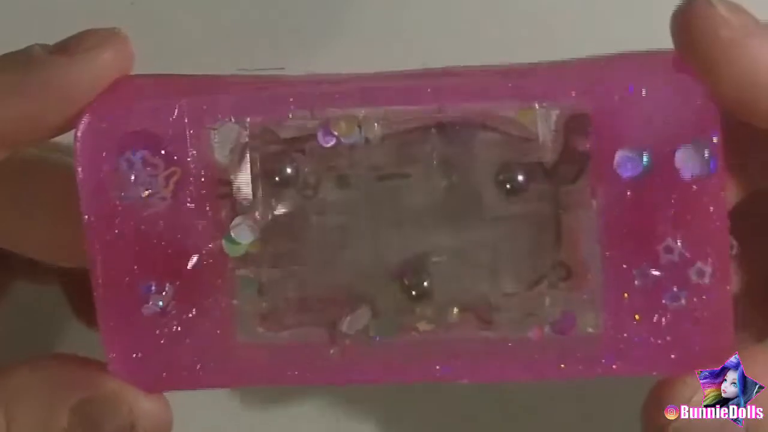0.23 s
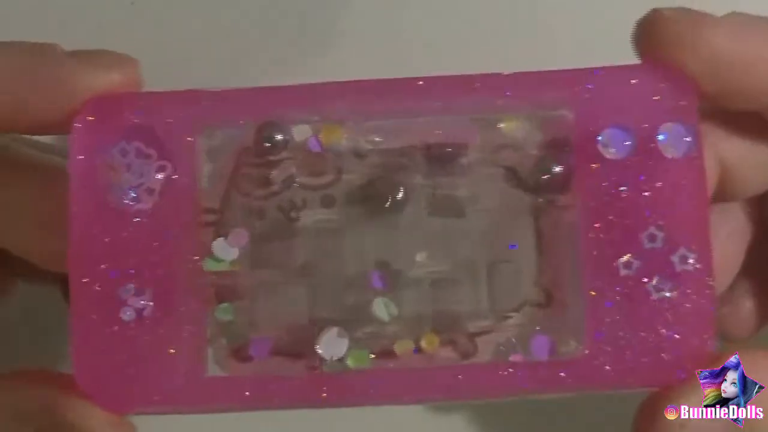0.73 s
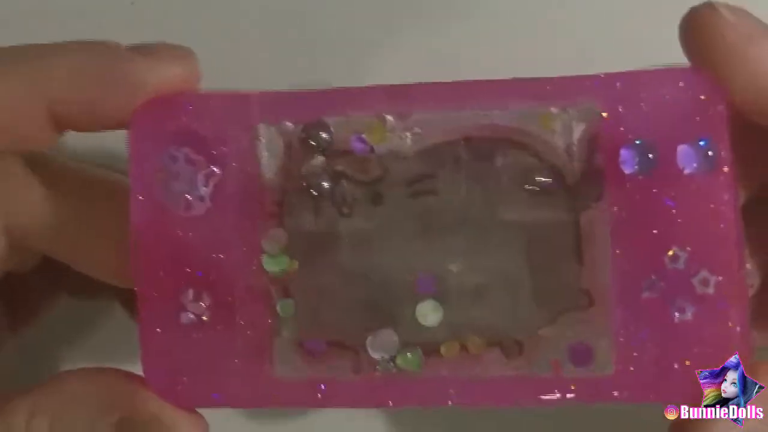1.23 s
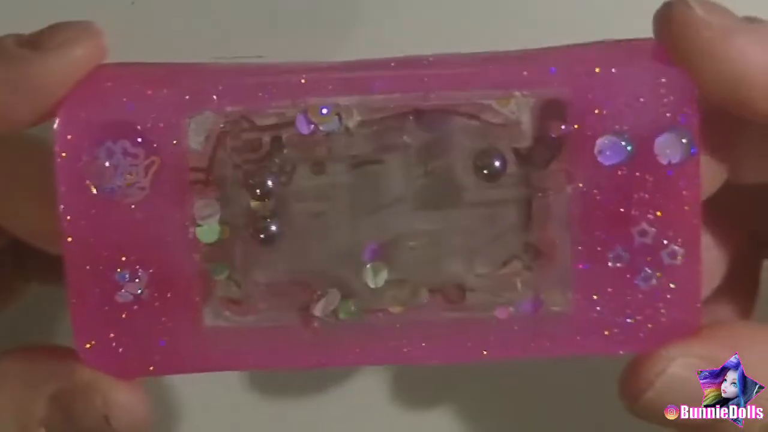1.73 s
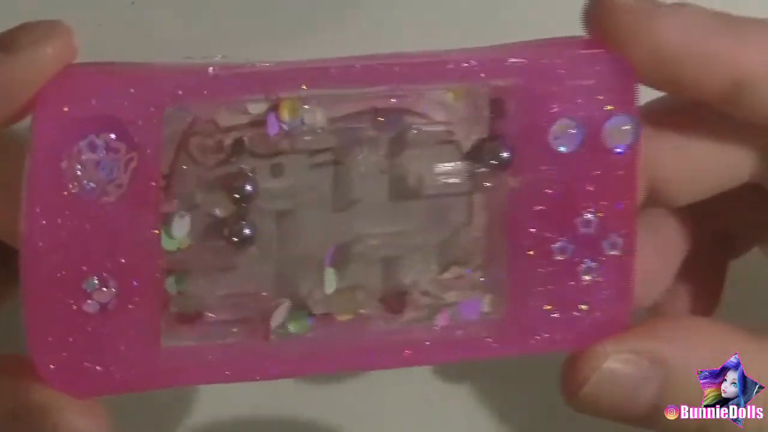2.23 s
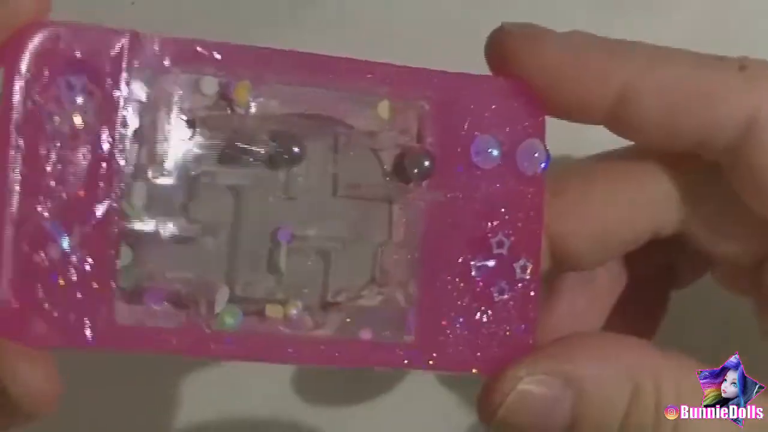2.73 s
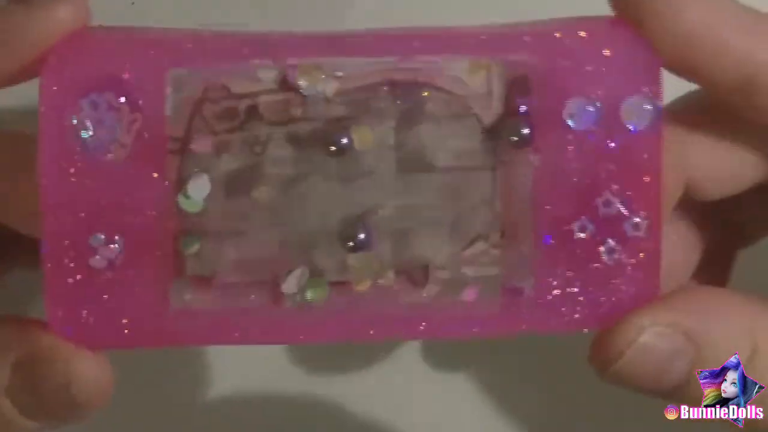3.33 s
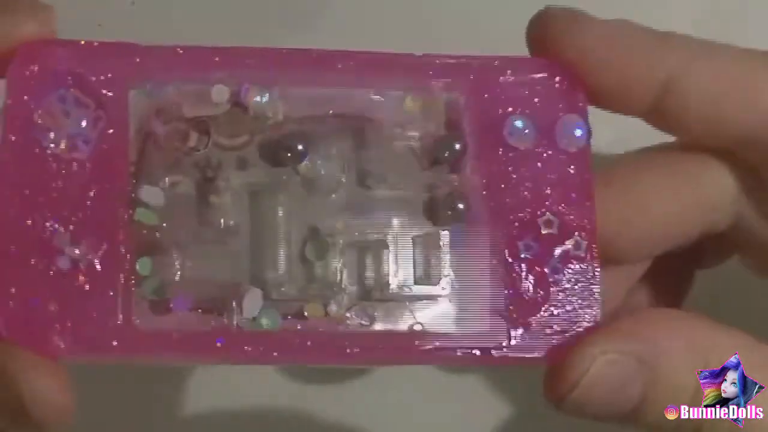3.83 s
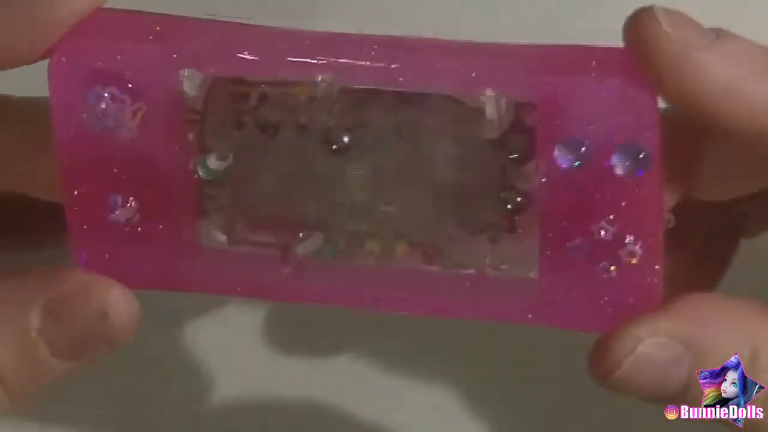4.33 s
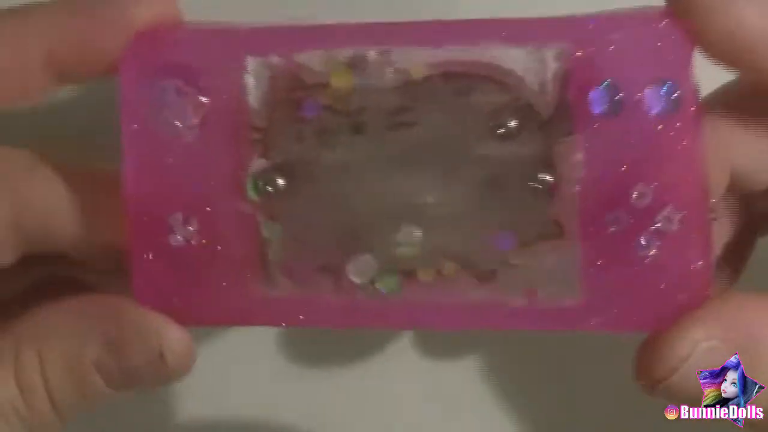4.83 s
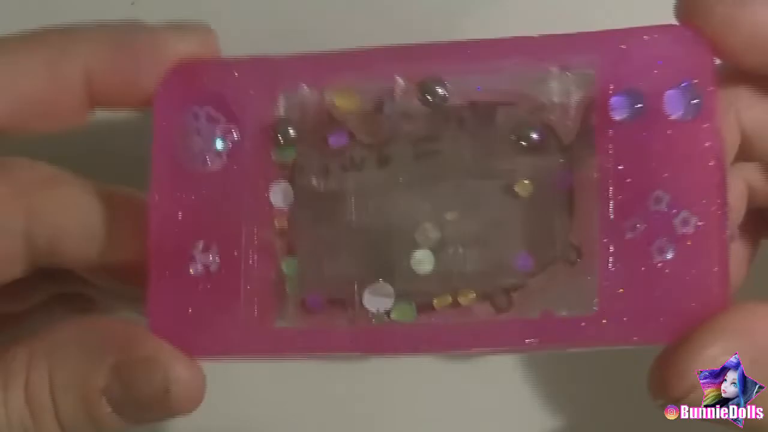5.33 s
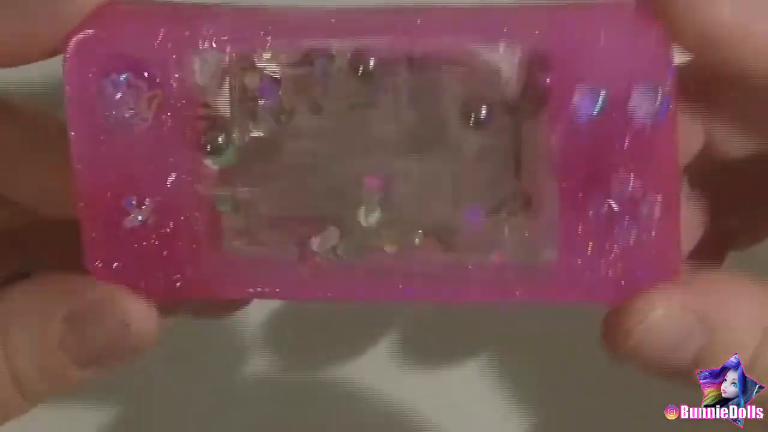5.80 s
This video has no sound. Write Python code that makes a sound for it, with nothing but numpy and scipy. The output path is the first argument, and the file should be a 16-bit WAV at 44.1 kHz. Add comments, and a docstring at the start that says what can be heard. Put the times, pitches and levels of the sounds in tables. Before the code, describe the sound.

In a small quiet room, a resin toy with steel balls and loose sequins is tilted close to a stereo microphone. Light ticks open the scene, then the sharpest clack lands at 0.07 seconds with a quick rattle until 0.26. Loose clicks run from 0.5 to 1.5, some thin and bright, and a tight cluster hits at 1.8. Faint ticking and light rolling follow around 2.0. After a lull, a strong burst clatters from 2.6 to 2.9, with smaller groups at 3.15, 3.6 to 3.9 and 4.3. Brighter, sequin-like ticking fills 4.5 to 4.8; busy knocks and rolling return from 5.0 to 5.4, then thin out to 6. Behind are soft hiss, a low drone and a faint whirr fluttering thirty times a second, dipping around 1.4-1.85 and 2.9-3.3. Six tiny thin pips pass at 0.3-0.46.

```python
"""In a quiet room a hand-held resin toy is tilted close to a pair of microphone ports.
Small steel balls knock about its shallow maze, each blow ringing the short modes of the case;
their rolling is a dense patter on the same modes, and short echoes come back from the room.
Farther behind lie a hiss over a low drone, and a faint throbbing whirr that drops twice, with six thin pips."""
import sys
import numpy as np
from scipy import signal
from scipy.fft import rfft, irfft
from scipy.io import wavfile
from scipy.ndimage import uniform_filter1d

SR = 44100
rng = np.random.default_rng(int(sys.argv[2]) if len(sys.argv) > 2 else 0)


def wav_record(signal):
    """Record a signal, one row per channel, as 16-bit PCM in the file named by sys.argv[1]."""
    frames = np.transpose(np.atleast_2d(signal))
    bounded = np.clip(frames, -1, 1)
    # unit amplitude maps onto the largest positive 16-bit level
    quanta = np.round(bounded * 32767).astype(np.int16)
    wavfile.write(sys.argv[1], SR, quanta)


N = 267466  # length in samples

# Ball against wall or lid: start_s, body_db (drive of the modes), bright_db and top_db (both against body)
KNOCKS = [(0.0003, -33.5, -3, -29), (0.0075, -32.5, 5, -27), (0.028, -39, -1, -24),
          (0.0742, -16.5, -7.5, -26), (0.0851, -29.5, -5, -41), (0.0913, -21.5, -1, -33),
          (0.1007, -27.5, -4, -32), (0.1078, -47, -5, -32), (0.1109, -44, -11, -27), (0.1763, -32, -4, -37),
          (0.2062, -24.5, -6.5, -35), (0.2629, -46, -6, -45), (0.473, -34, -19, -55),
          (0.4772, -36, -12, -55), (0.5198, -33.5, -5, -29), (0.5247, -41, -2, -31),
          (0.5656, -45.5, -15, -33), (0.6133, -34.5, -7.5, -33), (0.6564, -36, -9, -53),
          (0.678, -50, -7, -46), (0.7104, -40, -8, -51), (0.7244, -36.5, -6, -55), (0.7319, -35, -12, -58),
          (0.7493, -34, 2, -34), (0.7782, -24, -7, -20), (0.7901, -26.5, -2.5, -38),
          (0.7955, -34.5, -4, -36), (0.8663, -26, -12.5, -26), (0.8733, -34.5, -3, -34),
          (0.9163, -37, -14.5, -40), (0.9209, -32.5, -6, -55), (0.9475, -40, -11, -41),
          (0.9687, -39, -13, -53), (1.0144, -36.5, -14, -50), (1.0516, -33.5, 8.5, -9.5),
          (1.0643, -28, -3, -45), (1.1259, -35.5, -8, -24), (1.1817, -61, 11.5, -14),
          (1.2416, -38, -10, -50), (1.2776, -30.5, 1.5, -16), (1.2859, -32.5, -5, -20),
          (1.347, -40.5, 2, -17), (1.3828, -41.5, 2, -25), (1.4062, -49, -3, -44),
          (1.4883, -46.5, -1.5, -36), (1.5057, -57, -4, -41), (1.7469, -38, -17, -56.5),
          (1.7727, -34.5, -8, -42), (1.7841, -29.5, 3.5, -15), (1.7935, -21, -18, -28),
          (1.8185, -26.5, -0.5, -28), (1.8294, -33, -6, -32), (1.8348, -30.5, -9, -34),
          (1.988, -45, -17, -46), (1.9985, -41.5, -12, -49), (2.0445, -40, 3.5, -54),
          (2.0653, -40.5, 7.5, -42), (2.0738, -44, -14, -48), (2.1043, -47, 4, -38),
          (2.191, -48.5, 7.5, -26), (2.2197, -59, 9, -38), (2.5706, -44, -13, -48), (2.5764, -43, -11, -47),
          (2.5849, -36, -7, -37), (2.5907, -31.5, -7.5, -43), (2.6223, -39, -1, -44),
          (2.6312, -18.5, -6, -25), (2.6498, -26.5, 2, -33), (2.6625, -41, 4, -23), (2.7255, -23, -11, -30),
          (2.7342, -33, 1, -18), (2.7741, -29, -8, -30), (2.7806, -27, -13, -31), (2.7939, -22.5, -9, -36),
          (2.8011, -34, -12, -34), (2.8199, -30, -11, -41), (2.8391, -30, -6, -36), (2.8457, -39, -11, -28),
          (2.8689, -28, -3.5, -32), (2.9248, -38, -9, -52), (3.0204, -59.5, 14.5, -22),
          (3.1166, -45, -5, -49), (3.122, -47, -7, -46), (3.1278, -36, -7, -52), (3.1435, -30.5, 3, -38),
          (3.1523, -31, -2, -37), (3.1576, -28.5, -3, -29), (3.1632, -37, -10, -40),
          (3.1755, -33.5, 4, -33), (3.2072, -35, -2, -31), (3.2141, -27.5, -3, -42),
          (3.5789, -41.5, -2, -58), (3.5939, -51, -4, -22), (3.6756, -32.5, -9, -31),
          (3.6926, -32, -5, -40), (3.7033, -31, -1, -27), (3.7132, -26.5, -4.5, -32),
          (3.7303, -27, -9, -39), (3.7823, -26, -7, -24), (3.7976, -26, -2.5, -34), (3.8309, -34, -3, -17),
          (3.8381, -35, -1, -30), (3.8697, -41, 4, -30), (3.893, -33.5, 2.5, -28), (3.9151, -28, 3, -37),
          (3.9405, -39.5, 4, -38), (4.0475, -61.5, 14.5, -23), (4.0954, -73, 22.5, -2),
          (4.2524, -43, -4, -48), (4.2955, -31, -1, -50), (4.3057, -30.5, 0, -44), (4.3101, -35.5, -2, -42),
          (4.3316, -38.5, -2, -52), (4.3378, -36, -0.5, -50), (4.3496, -41, -2, -50),
          (4.3542, -40, -4, -52), (4.364, -41, -5, -52), (4.5058, -47, 4, -35), (4.5278, -38, -9, -34),
          (4.5502, -37, 7.5, -27), (4.5821, -39.5, 11, -2), (4.5942, -35, 7.5, -29), (4.599, -33, -4, -30),
          (4.6085, -39, 4.5, -16), (4.6176, -39, -5, -28), (4.6522, -32, 11, -16), (4.664, -36, -4, -18),
          (4.684, -33.5, -3, -29), (4.6996, -39, 1, -14), (4.7121, -31, -0.5, -34), (4.7202, -44, -4, -26),
          (4.783, -37, -3.5, -43), (4.7889, -36.5, 0, -49), (4.9378, -61, 7, -32), (4.9516, -51, 6.5, -46),
          (4.9951, -43, -4, -49), (5.0019, -52, -7, -51), (5.0135, -23.5, -2.5, -43),
          (5.0312, -26.5, -2, -27), (5.0735, -33.5, -6, -47), (5.1041, -38, -18, -36),
          (5.126, -35.5, 0, -37), (5.1406, -24.5, -1.5, -13), (5.155, -35.5, 2, -28), (5.1889, -43, 8, -18),
          (5.1925, -30.5, -6.5, -16), (5.2293, -23.5, -6, -38), (5.2401, -35, -6, -41),
          (5.249, -27, -1.5, -24), (5.2711, -48, -8, -40), (5.2821, -33.5, 1, -24), (5.293, -34, -8, -46),
          (5.2995, -42, 0, -31), (5.3118, -34, -12, -28), (5.3252, -33, -4, -28), (5.3321, -42, 2, -25),
          (5.3622, -37.5, -0.5, -28), (5.3673, -42, -5, -32), (5.5425, -42.5, -1, -40),
          (5.5489, -47.5, -5, -44), (5.6975, -54, 4, -17), (5.7018, -43, 2, -26), (5.7294, -53, 1, -29),
          (5.785, -42, 0, -33), (5.8738, -31.5, -11, -52), (5.8847, -46, -2, -34), (5.8925, -38, -5, -52),
          (5.9165, -49, -3, -47), (5.9752, -49.5, 0, -19)]
# Modes of case and lid: pitch_hz, level_db
CASE_MODES = [(1350, -29), (1735, -8.5), (1800, -1.5), (2150, -39), (2400, -13), (2600, -9.5),
              (2800, -13.5), (3000, -2.5), (3250, 0), (3480, -22), (3750, -8.5), (4050, -4), (4380, -5.5),
              (4700, -2.5), (4950, 2), (5200, 4), (5500, -3), (5850, 1), (6300, -1.5), (6800, 5),
              (7400, 6.5), (7950, -1), (8500, 3), (9300, 0.5), (10000, 7), (11000, -11), (12100, -15),
              (13500, -10), (14900, -11)]
# Ring time of the modes: pitch_hz, t60_s
MODE_RING = [(1350, .015), (1770, .03), (2150, .016), (3200, .012), (5000, .009), (7000, .006),
             (10000, .003), (13500, .003)]
# Share of the deep modes as the toy is held and turned, before each knock's own shift:
# time_s, level_db (against body)
DEEP_SHARE = [(0, -18.5), (.5, -6), (.72, -14), (1.1, -11.5), (1.4, -23), (1.8, -8.5), (2.6, -12),
              (3.2, -12.5), (3.8, -14), (4.3, -12.5), (4.7, -7.5), (5.05, -12.5), (5.3, -3), (6.06, -10.5)]
# Balls rolling and sequins sliding, one run per tilt:
# full_speed_start_s, full_speed_length_s, level_db (drive of the modes), bright_db (against level)
ROLLS = [(0, .12, -74, 3.5), (0.197, 0.048, -85, -1), (0.52, .03, -85.5, -3), (0.718, 0.042, -79.5, 3),
         (0.945, 0.12, -78.5, -7), (1.29, .03, -89.5, 5), (1.777, 0.029, -71.5, -9.5),
         (1.986, 0.2, -90, -2), (2.636, .03, -73.5, -1), (2.744, 0.082, -77, -6), (3.164, 0.073, -78, 1.5),
         (3.713, 0.22, -81.5, 3.5), (4.304, 0.058, -87, 2), (4.471, 0.098, -82.5, 5.5),
         (4.592, .12, -81, 5), (5.005, 0.03, -74.5, -3.5), (5.13, .17, -76, 4.5), (5.544, 0.018, -93, -4),
         (5.694, 0.21, -85, 4)]
# Level between the ports for the close toy: pitch_hz, left_minus_right_db
PORT_BALANCE = [(700, -2), (1290, 10.5), (1800, 3.5), (2400, -1.5), (4400, -1), (6500, 1.5), (8500, -3.5),
                (11000, -13), (15000, 1)]
# Phase between the ports for the close toy: pitch_hz, left_lead_rad
PORT_PHASE = [(500, -1.5), (1200, -0.95), (3000, -1.04), (3600, 0.4), (5900, -1.1), (7700, -2),
              (10000, -0.8), (13000, 1.5)]
# Spectrum shape of the whirr: pitch_hz, level_db (per Hz, relative)
WHIRR_SPECTRUM = [(500, -12.5), (700, -1), (1000, 1.5), (1200, -6.5), (1550, 0.5), (2100, 2), (2700, -2.5),
                  (4000, -17.5)]
# Drops of the whirr: from_s, to_s, level_db (change)
WHIRR_DROPS = [(1.37, 1.854, -8), (2.9, 3.297, -6)]
# Spectrum shape of the room tone: pitch_hz, level_db (per Hz, relative)
ROOM_TONE_SPECTRUM = [(15, -63), (25, -10), (43, -23.5), (225, -5), (265, -5.5), (312, 5), (378, -3),
                      (537, -14), (1320, -67), (2670, -16.5), (4350, -13.5), (5400, -18), (7480, -17.5),
                      (14000, -26.5), (16400, -45)]
# Slow swelling and sinking of the low drone: time_s, level_db (change)
DRONE_SWELL = [(0, 7.5), (.4, 3.5), (.8, 4), (1.5, 0.5), (2.5, -0.5), (3.5, 0.5), (4.5, 1.5), (5.3, 2.5),
               (6.06, 1)]
# Left-right likeness of the background noises: pitch_hz, correlation (-1 to 1)
LIKENESS = [(60, 0.99), (130, 0.052), (290, 0.65), (640, 0.039), (15000, 0.041)]

DEEP_HZ, BODY_HZ, BRIGHT_HZ, TOP_HZ = 1800, 2700, 5000, 8800  # the four colour regions of a knock
# Deep share follows the colour and strength of a knock (dB per dB)
DEEP_PER_BRIGHT, DEEP_PER_LEVEL, USUAL_KNOCK_DB = 0.22, -0.058, -42.5
ROLL_RISE_DB_PER_S, ROLL_FALL_DB_PER_S, REST_DB = 186, 190, -99
TICKS = 360  # small knocks at random moments
TICK_DB, TICK_SPREAD_DB = 28.5, 4.5  # over the level of the rolling, and scatter
TICK_BRIGHT_DB, TICK_TOP_DB, TICK_COLOUR_DB = -4, -36, 5  # usual colour and its scatter
RATTLE_TOP_DB = 9  # top modes in the after-rattle, against their share in the blow
ROOM_T60_S, WALL_CUT_HZ = 0.21, 9000
WHIRR_DB, DROP_EDGE_S = -66.5, .07
THROB_PER_S = 30
PIPS_FROM_S, PIP_DB, PIP_LOSS_DB = .2933, -91.5, 1.5  # first pip, drive of its double resonance, loss per pip
ROOM_TONE_DB = -63.5
CUTOFF_HZ = 16300


def from_db(db):
    """Gain of a level in dB."""
    return 10 ** (np.asarray(db) / 20)


def rms_one(x):
    """Scale to rms 1."""
    return x / np.sqrt(np.mean(x ** 2) + 1e-20)


def at_hz(points, hz):
    """Read a curve on a log-frequency axis."""
    points = np.array(points)
    return np.interp(np.log(hz), np.log(points[:, 0]), points[:, 1])


def ring(clicks, hz, t60):
    """A damped resonance: a unit click sets a sine of starting height 1 ringing."""
    r = from_db(-60 / (t60 * SR))  # loss per sample
    w = 2 * np.pi * hz / SR
    return signal.lfilter([0, np.sin(w)], [1, -2 * r * np.cos(w), r * r], clicks + 1e-18)


def knocks(roll_db):
    """The clear knocks, then small random ones following the rolling; start, level and three colours."""
    at = rng.integers(0, N, TICKS)
    chance = rng.standard_normal((TICKS, 3))
    tick_db = roll_db[at] + TICK_DB + TICK_SPREAD_DB * chance[:, 0]
    tick_colour_db = [TICK_BRIGHT_DB, TICK_TOP_DB] + TICK_COLOUR_DB * chance[:, 1:]
    ticks = np.c_[at / SR, tick_db, tick_colour_db]
    start_s, body_db, bright_db, top_db = np.r_[KNOCKS, ticks].T
    deep_db = np.interp(start_s, *np.transpose(DEEP_SHARE))
    deep_db += DEEP_PER_BRIGHT * bright_db + DEEP_PER_LEVEL * (body_db - USUAL_KNOCK_DB)
    return start_s, body_db, deep_db, bright_db, top_db


def rolling():
    """Each run gathers speed, holds and slows; the loudest run sets level and brightness in dB."""
    t = np.arange(N) / SR
    runs = []
    for start_s, length_s, level_db, _ in ROLLS:
        rise_db = ROLL_RISE_DB_PER_S * np.maximum(start_s - t, 0)
        fall_db = ROLL_FALL_DB_PER_S * np.maximum(t - start_s - length_s, 0)
        runs.append(level_db - rise_db - fall_db)
    bright_db = np.array(ROLLS)[np.argmax(runs, axis=0), 3]
    return np.maximum(np.max(runs, axis=0), REST_DB), bright_db


def patter(per_s, spread_db):
    """Random tiny contacts of uneven size and either sign; rms 1."""
    sizes = from_db(spread_db * np.minimum(rng.exponential(1, N), 4)) * rng.choice([-1, 1], N)
    return rms_one(sizes * (rng.random(N) < per_s / SR))


def case(scatter_db, spread_s, rattle_db, rattle_t60):
    """Knocks and rolling strike every mode; a bending wave reaches each part of the case at its own moment."""
    roll_db, roll_bright_db = rolling()
    start_s, body_db, deep_db, bright_db, top_db = knocks(roll_db)
    grit = patter(per_s=2600, spread_db=3.5)
    # a blow shares out its energy unevenly among neighbouring modes, about its own running mean
    chance = rng.standard_normal((len(start_s), len(CASE_MODES)))
    chance -= uniform_filter1d(chance, size=9, axis=1)
    late = rng.random((len(start_s), len(CASE_MODES)))
    fade = from_db(-60 / (rattle_t60 * SR))
    anchors = np.log([DEEP_HZ, BODY_HZ, BRIGHT_HZ, TOP_HZ])
    out = np.zeros(N)
    for k, (hz, level_db) in enumerate(CASE_MODES):
        # the colour of a knock is read between its four regions
        deep, _, bright, top = [np.interp(np.log(hz), anchors, row) for row in np.eye(4)]
        colour_db = deep * deep_db + bright * bright_db + top * top_db
        arrival_s = start_s + spread_s * (1 + 1.5 * top) * late[:, k]
        at = np.clip(np.round(arrival_s * SR).astype(int), 0, N - 1)
        blows = np.zeros(N)
        np.add.at(blows, at, from_db(body_db + colour_db + scatter_db * chance[:, k]))
        # loose sequins and the ball itself go on rattling after a blow, dying away
        dying = signal.lfilter([0, 1], [1, -fade], blows + 1e-18)
        rattle_level = from_db(rattle_db + RATTLE_TOP_DB * top) * dying
        roll_level = from_db(roll_db + roll_bright_db * bright - 8.8 * deep - 18.3 * top)
        mode_grit = np.roll(grit, k % 5 * 3)  # shifted a few samples from mode to mode
        shaken = blows * (-1) ** k + (rattle_level + roll_level) * mode_grit
        # the contact is soft, so each mode swells over a cycle or two
        band = [hz / 1.56, min(hz * 1.535, SR / 2.2)]
        soft = signal.butter(2, band, "band", fs=SR, output="sos")
        ringing = ring(shaken, hz, at_hz(MODE_RING, hz))
        out += from_db(level_db) * signal.sosfilt(soft, ringing)
    return out


def ports(x):
    """The two ports hear the close source with a level and phase difference that depends on pitch."""
    hz = np.arange(1, N // 2 + 2) * SR / N
    # half the difference goes to each side
    left = from_db(at_hz(PORT_BALANCE, hz) / 2) * np.exp(.5j * at_hz(PORT_PHASE, hz))
    return irfft(rfft(x) * [left, 1 / left], N)


def room(x):
    """Echoes from six feedback delays a side, weaker and duller on every round."""
    out = np.zeros((2, N))
    dull = np.exp(-2 * np.pi * WALL_CUT_HZ / SR)
    lags_ms = np.array([4.3, 5.1, 7.7, 8.9, 11.3, 12.7, 16.1, 17.9, 21.1, 23.3, 28.7, 31.9])
    for k, lag in enumerate((lags_ms * SR / 1000).astype(int)):
        loop, state = x.copy(), [0.]
        gain = from_db(-60 * lag / SR / ROOM_T60_S)
        # stepped one delay length at a time
        for i in range(lag, N, lag):
            back, state = signal.lfilter([gain * (1 - dull)], [1, -dull], loop[i - lag:i], zi=state)
            loop[i:i + lag] += back[:N - i]
        out[k % 2] += (loop - x) * (-1) ** (k // 2)  # echoes only, sides and signs by turns
    return out


def coloured_noise(spectrum):
    """Stereo noise of a given spectrum, its left-right likeness set by mixing mid and side; rms 1."""
    hz = np.arange(1, N // 2 + 2) * SR / N
    mid, side = rfft(rng.standard_normal((2, N)))
    alike = np.clip(at_hz(LIKENESS, hz), -1, 1)
    pair = np.sqrt(1 + alike) * mid + np.sqrt(1 - alike) * side * [[1], [-1]]
    return rms_one(irfft(pair * from_db(at_hz(spectrum, hz)), N))


def throb(depth_db, lag_turns):
    """Gain of thirty swells a second; the beat jumps half a turn at 1.6 s, inside the whirr's first drop."""
    t = np.arange(N) / SR
    turns = THROB_PER_S * t - lag_turns - (t < 1.6) / 2
    return from_db(depth_db * np.cos(2 * np.pi * turns))


def whirr(depth_db):
    """Mid-pitched noise that throbs evenly and drops twice, with six thin resonant pips at the throb's pace."""
    t = np.arange(N) / SR
    beats = np.arange(6)
    clicks = np.zeros(N)
    pips_at = ((PIPS_FROM_S + beats / THROB_PER_S) * SR).astype(int)
    clicks[pips_at] = from_db(PIP_DB - PIP_LOSS_DB * beats)
    pips = ring(ring(clicks, 3900, .03), 3900, .03)  # the second resonance makes each pip swell
    level_db = np.full(N, WHIRR_DB)
    for from_s, to_s, change_db in WHIRR_DROPS:
        inside_s = np.minimum(t - from_s, to_s - t)
        level_db += change_db * np.clip(inside_s / DROP_EDGE_S + .5, 0, 1)
    noise = throb(depth_db, lag_turns=0.19) * coloured_noise(WHIRR_SPECTRUM)
    return from_db(level_db) * noise + pips


def room_tone(depth_db):
    """Noise split at 480 Hz: steady hiss above, and a low drone below that throbs and slowly swells."""
    side_gain = from_db([[-.5], [.5]])  # the right is slightly louder
    tone = from_db(ROOM_TONE_DB) * coloured_noise(ROOM_TONE_SPECTRUM) * side_gain
    low = signal.sosfiltfilt(signal.butter(2, 480, fs=SR, output="sos"), tone)
    hiss = tone - low
    swell_db = np.interp(np.arange(N) / SR, *np.transpose(DRONE_SWELL))
    return hiss + low * from_db(swell_db) * throb(depth_db, lag_turns=0.37)


def scene():
    """The toy close by, its echoes, the whirr and the room tone."""
    toy = case(scatter_db=3.5, spread_s=.0003, rattle_db=-34.0, rattle_t60=0.082)
    echoes = from_db(-17.5) * room(toy)
    return ports(toy) + echoes + whirr(depth_db=3.8) + room_tone(depth_db=1.75)


def record(dry):
    """The microphone drops the deepest bass; the top is cut."""
    dry = signal.sosfilt(signal.butter(3, 42, "high", fs=SR, output="sos"), dry)
    return signal.sosfilt(signal.cheby2(12, 70, CUTOFF_HZ, fs=SR, output="sos"), dry)


dry = scene()
out = record(dry)
wav_record(out)
```